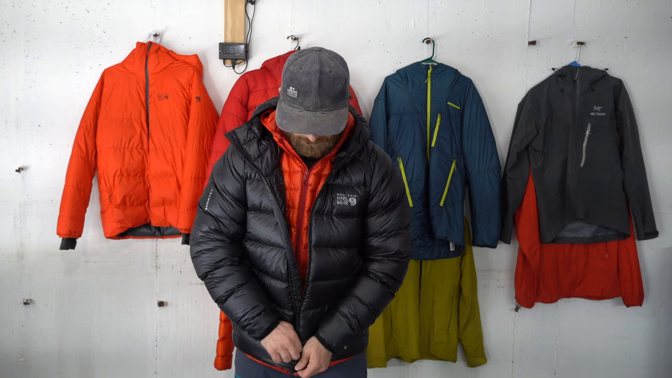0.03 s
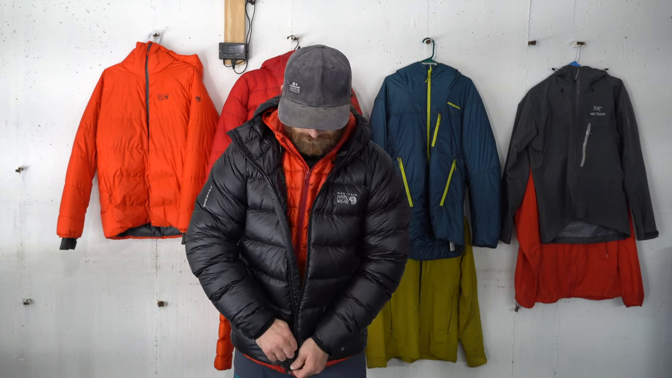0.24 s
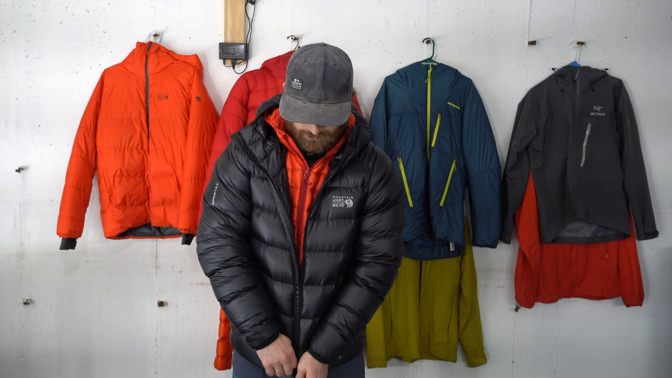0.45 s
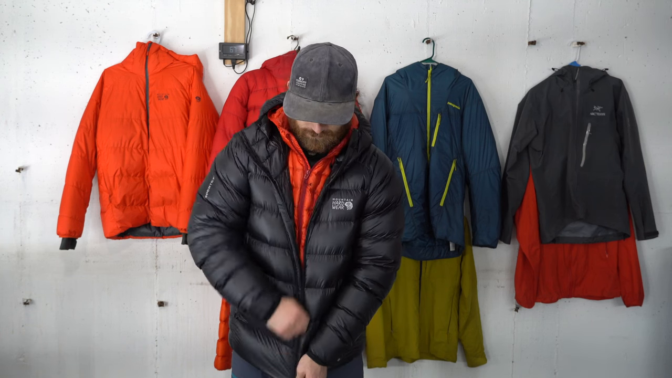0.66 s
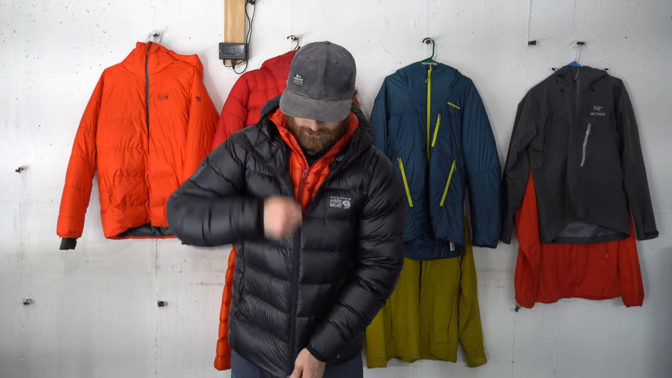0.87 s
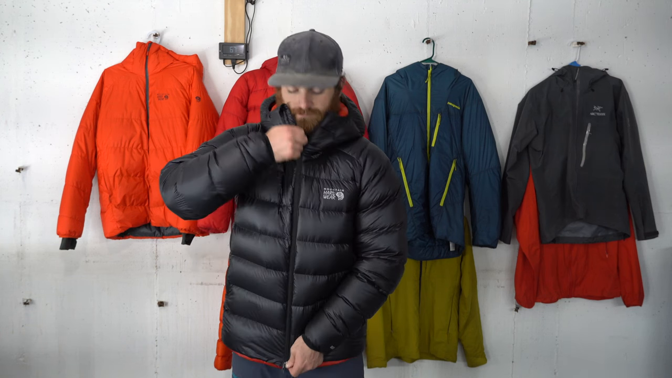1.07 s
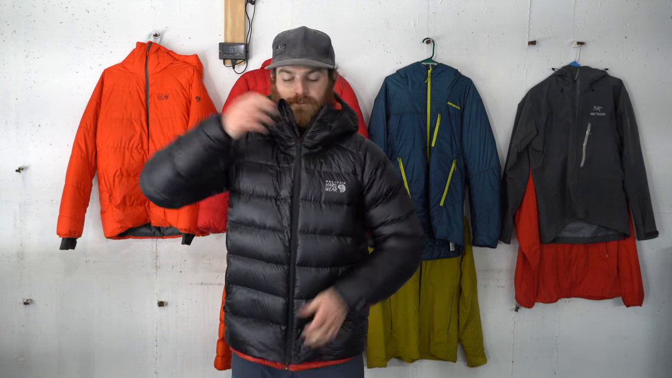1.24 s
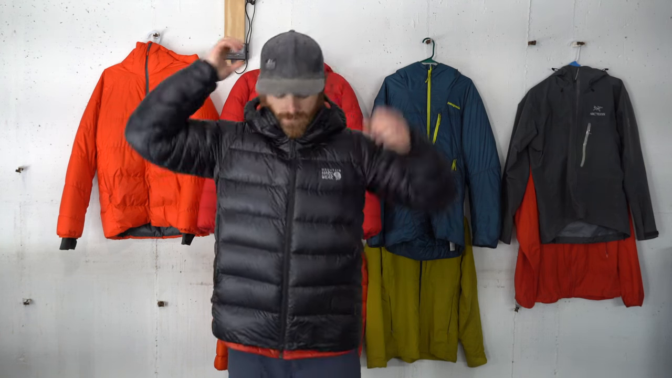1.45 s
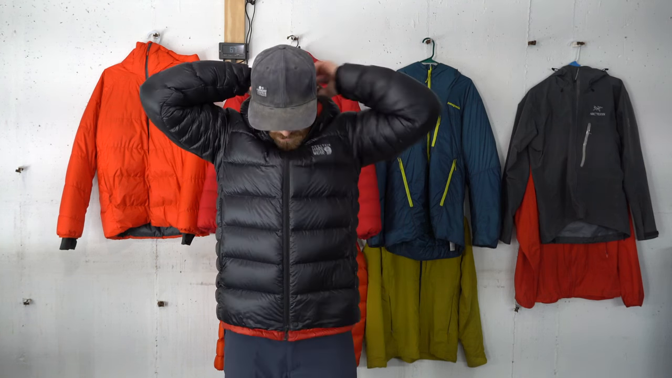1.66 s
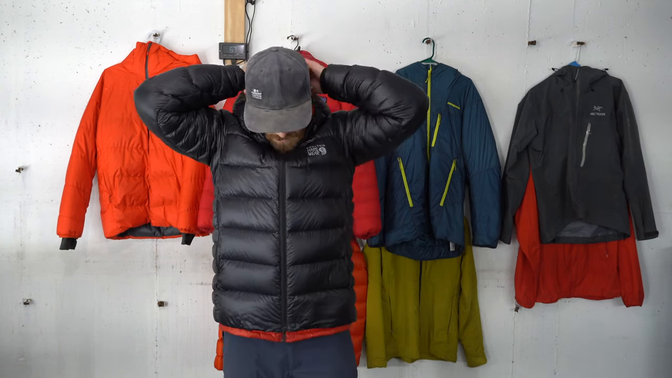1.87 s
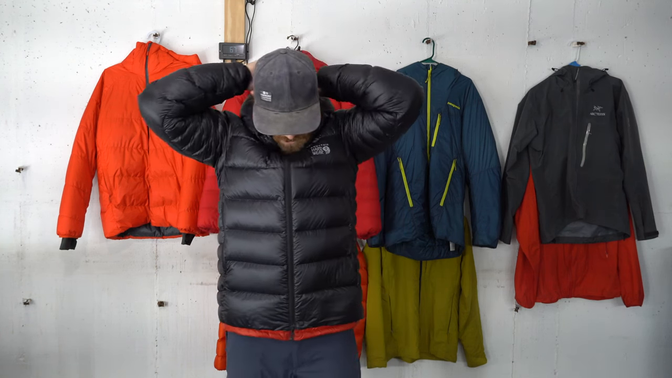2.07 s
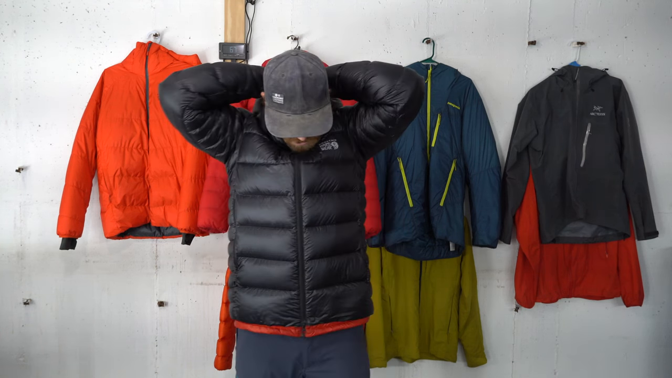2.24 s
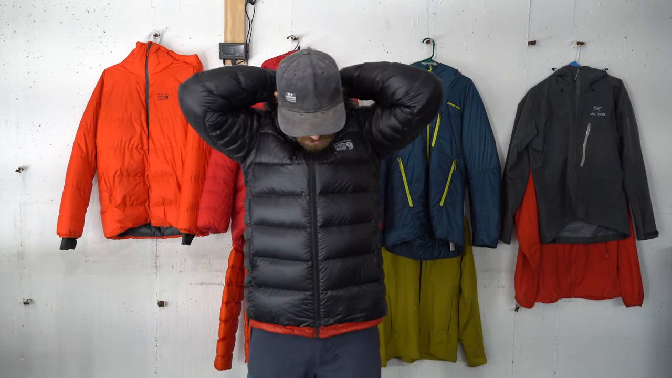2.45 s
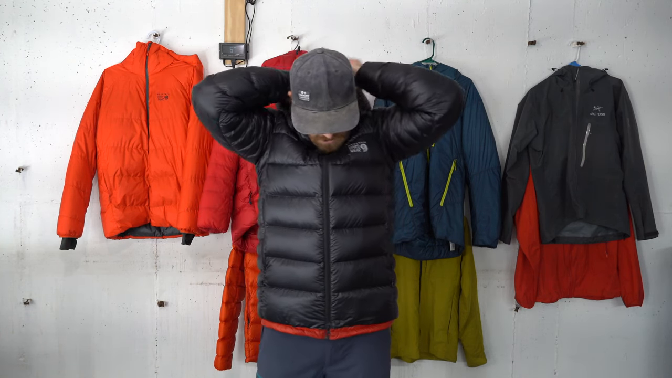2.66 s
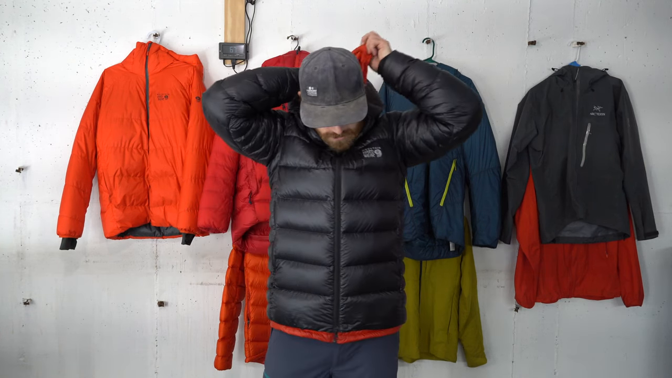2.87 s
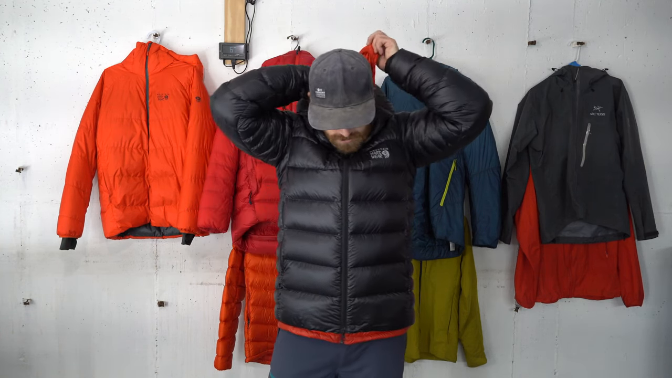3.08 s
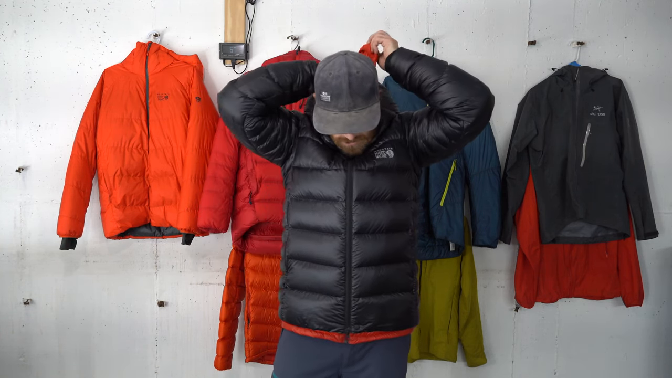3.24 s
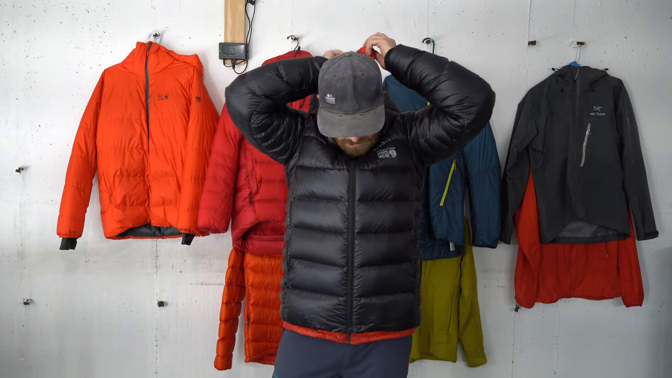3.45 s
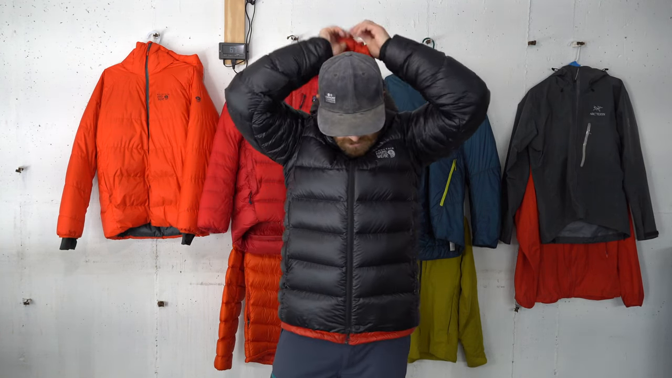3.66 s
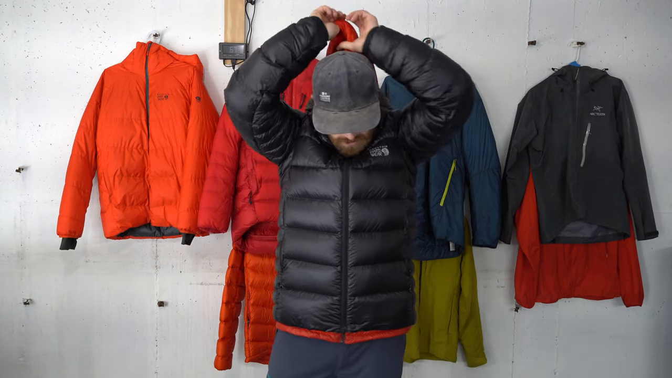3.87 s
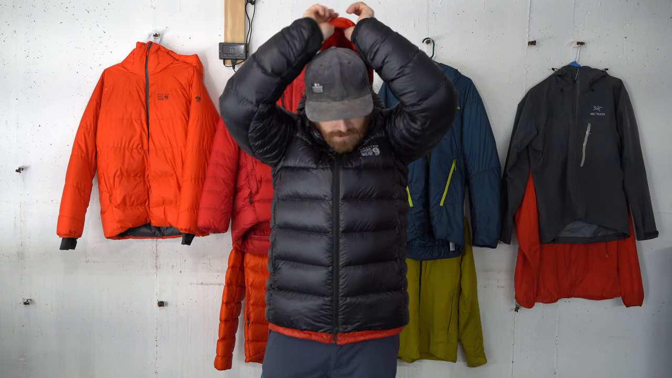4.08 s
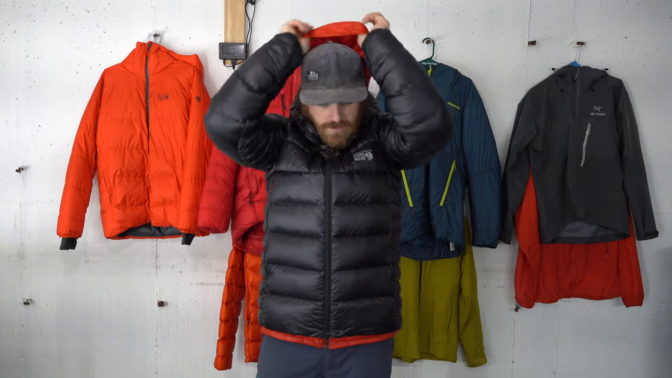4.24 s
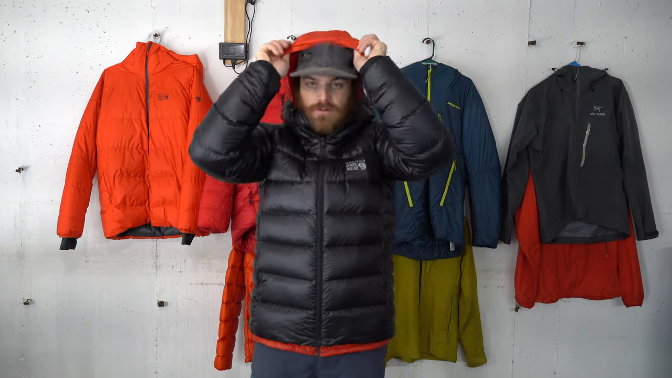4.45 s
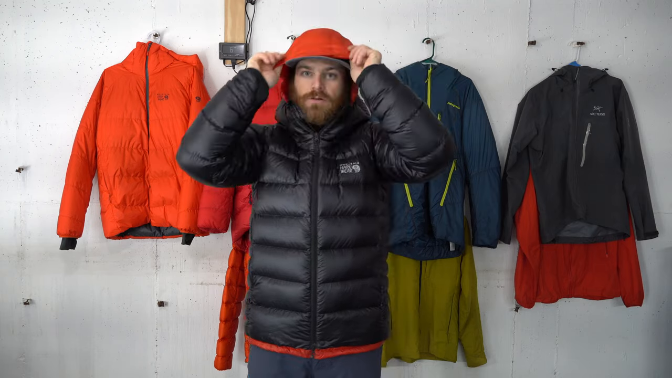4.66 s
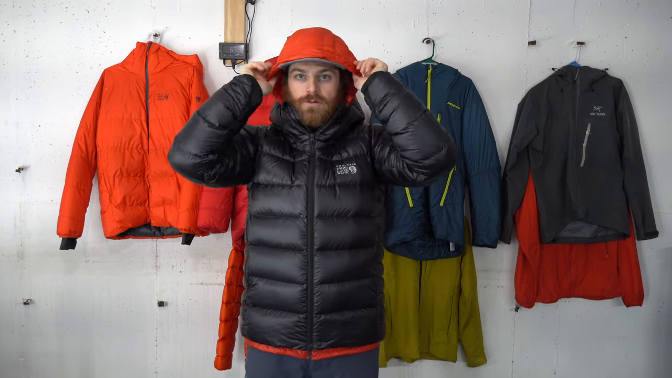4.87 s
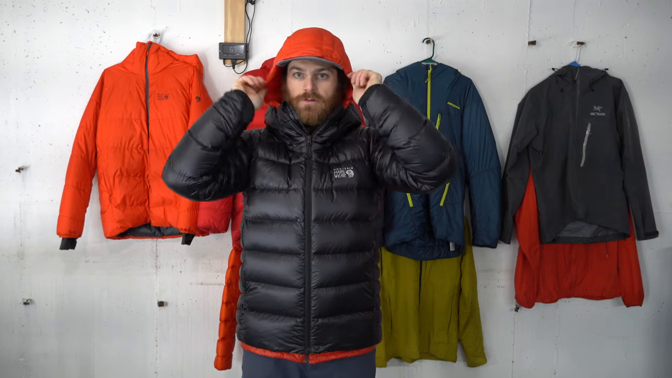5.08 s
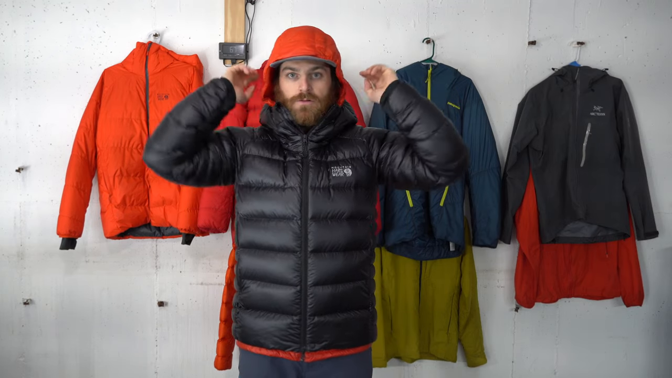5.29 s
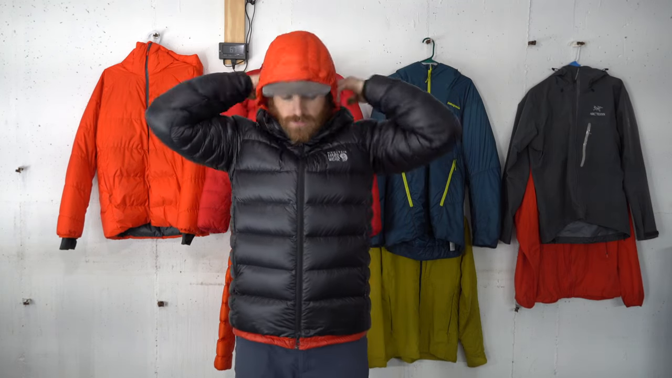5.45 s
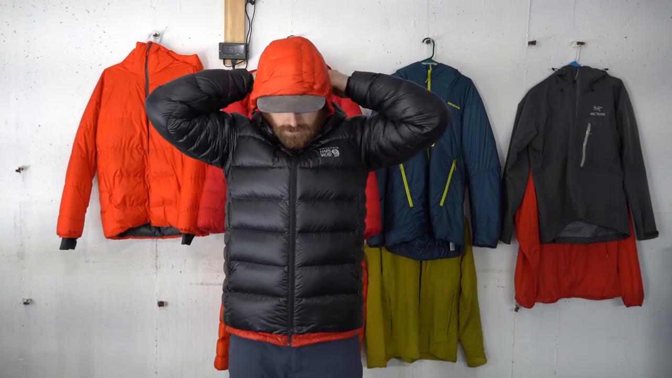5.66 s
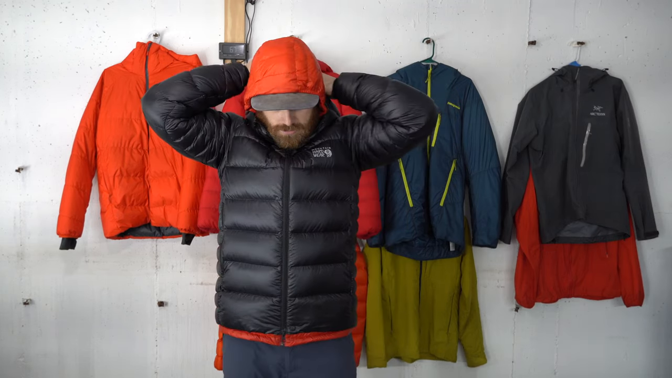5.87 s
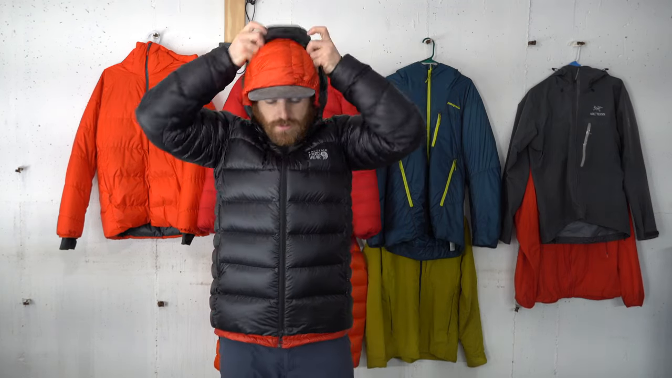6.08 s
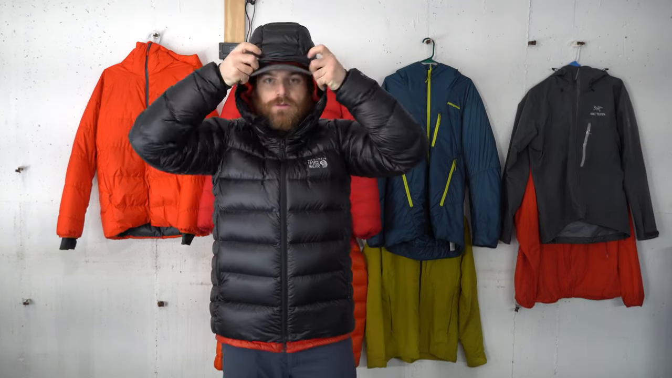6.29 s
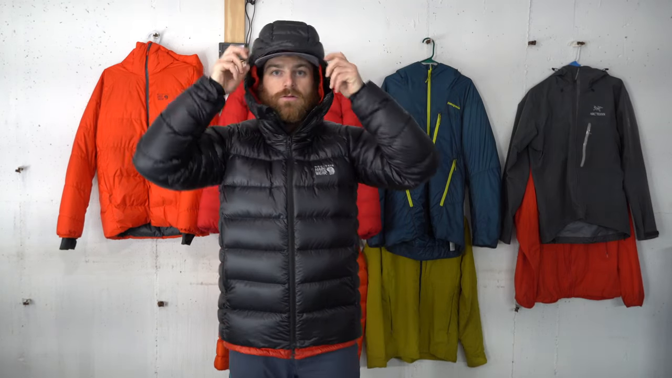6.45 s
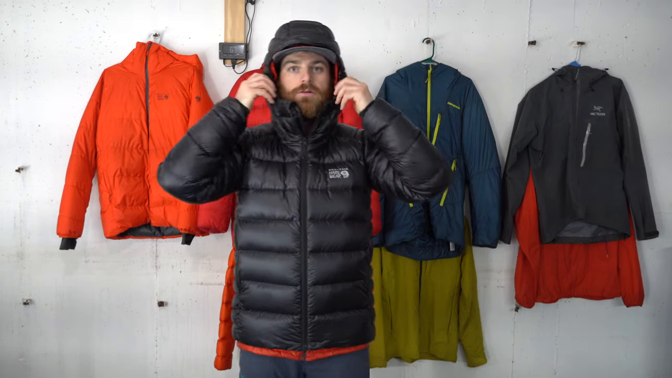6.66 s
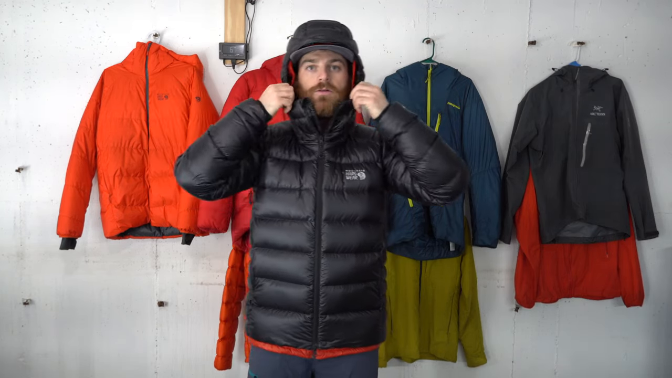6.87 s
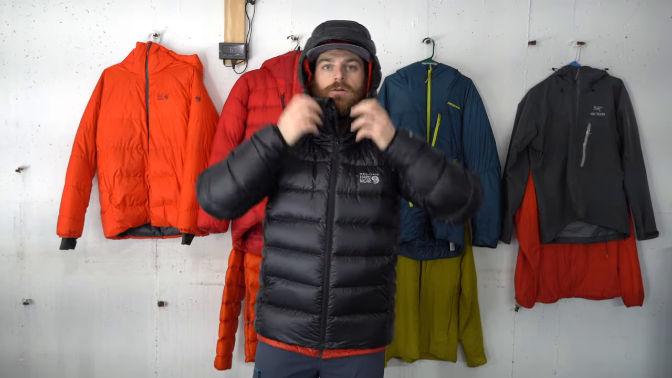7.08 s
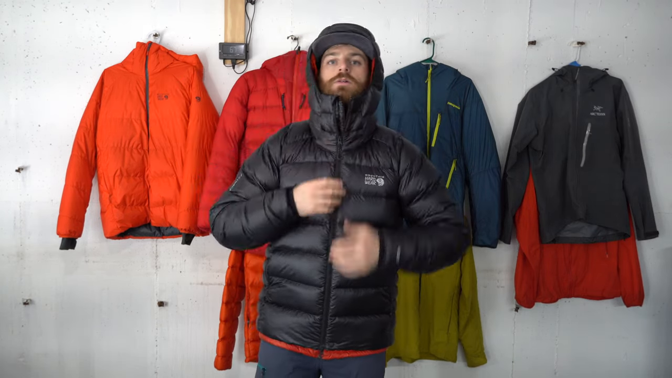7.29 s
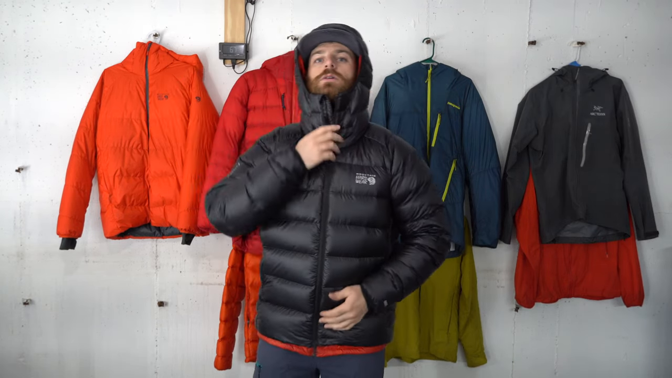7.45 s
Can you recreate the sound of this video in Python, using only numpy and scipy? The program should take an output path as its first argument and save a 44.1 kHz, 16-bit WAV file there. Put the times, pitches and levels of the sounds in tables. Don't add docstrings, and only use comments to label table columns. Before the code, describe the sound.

Close, dry indoor sound of a puffy jacket zipped up fast with a buzzing whir, followed by swishing, crinkling, softly bumping nylon.

```python
import sys
import numpy as np
from scipy import signal
from scipy.fft import rfft, irfft, next_fast_len
from scipy.io import wavfile
from scipy.ndimage import uniform_filter1d

SR = 44100
rng = np.random.default_rng(int(sys.argv[2]) if len(sys.argv) > 2 else 0)


def amplitude_ratio(level_db):
    exponent = np.asarray(level_db, float) / 20
    return 10 ** exponent


def generate_wav(sig):
    pcm = np.round(np.clip(np.atleast_2d(sig).T, -1, 1) * 32767).astype(np.int16)
    wavfile.write(sys.argv[1], SR, pcm)


N = 331835
TIME = np.arange(N) / SR

# [t/s, tooth rate f/Hz, level/dB, lean to one row of teeth/dB, third partial/dB]
ZIP_START = [
    (.71, 790, -42, 3, -66),
    (.724, 760, -33, -4, -62),
    (.749, 684, -26, -13, -62),
    (.772, 716, -27, -23, -64),
    (.8, 640, -23.5, -24, -57),
    (.825, 632, -23, -14, -53),
]
# [t/s, tooth rate f/Hz, level/dB, lean/dB, third partial/dB]
ZIP_PULL = [
    (.842, 637.3, -23, 0, -59),
    (.858, 722, -28.5, 6, -60),
    (.876, 796, -29.5, 10, -62),
    (.9, 878, -31.5, 8, -54),
    (.934, 918.4, -32, 0, -49),
    (.965, 970, -33, 10, -61),
]
# [t/s, tooth rate f/Hz, level/dB, lean/dB, third partial/dB]
ZIP_DRAG = [
    (.984, 985, -35, 5, -52),
    (1.008, 765, -21, -7, -39),
    (1.037, 714, -21, -12, -47),
    (1.068, 552.8, -30, 1, -48),
    (1.088, 480, -32.5, 2, -33),
    (1.114, 415, -31, -3.5, -31),
    (1.13, 340, -34, 9, -39),
    (1.14, 281, -28, 5, -35),
    (1.151, 205, -33, 6, -42),
]
# [t/s, tooth rate f/Hz, level/dB, lean/dB, third partial/dB]
ZIP_TUG = [
    (1.168, 455.5, -26, 3, -40),
    (1.186, 372.4, -27.5, 7.5, -32),
    (1.198, 300, -34, 12, -39),
    (1.211, 233, -26, 4, -31),
    (1.218, 185, -23, 0, -38),
    (1.2235, 150, -22, -3, -43),
]
# [t/s, share of speed lost]
SNAGS = [
    (1.014, 0.043),
    (1.028, 0.1124),
    (1.048, 0.136),
    (1.06, 0.02),
    (1.075, 0.078),
    (1.093, 0.051),
    (1.101, 0.091),
]
# [fourth partial/dB, wobble 0-1]
FREE = (-67, 0.009)
GRITTY = (-49.5, 0.022)
# [f/Hz, width/Hz, boost/dB]
TAPE_RINGS = [
    (900, 300, 4),
    (2680, 320, 12),
    (3400, 250, 7),
]
# [f/Hz, level/dB per Hz]
RASP = [(150, -30), (400, -2), (1200, -2), (2700, -6), (3800, -14), (6000, -40)]

# [f/Hz, level/dB per Hz]
PUSH = [(12, -26), (20, -3.5), (48, 1), (161, -4.5), (253, -9), (300, -12.5), (390, -24), (660, -120)]
RUB = [(59, -16), (100, -5), (162, -3.5), (271, -3), (434, -3.5), (1310, -10), (2500, -26), (3250, -40),
       (5500, -120)]
SCRAPE = [(700, -55), (1300, -3.5), (1900, 0), (3000, -5), (4500, -13), (7500, -26), (9000, -62)]
SWISH = [(1470, -23), (2500, -4), (3720, -5), (4830, -5.5), (7240, -8.5), (8830, -21), (12600, -20.5),
         (14100, -24), (14900, -29), (15600, -37)]
# [peak t/s, rise/s, fall/s, rub level/dB, scrape share/dB]
MOVES = [(.2, .9, 0.19, -70, -18), (.523, 0.11, 0.2, -47, -15.5), (.8, 0.21, 0.43, -51, -14),
         (1.042, 0.07, 0.29, -44, -12), (1.201, 0.37, 0.089, -41, -14.5),
         (1.268, 0.048, 0.026, -38.5, -4.5), (1.47, 0.36, 0.99, -40.5, -5),
         (1.6, 0.092, 0.22, -35.5, -6), (1.95, 0.19, 0.22, -49.5, -25), (2.24, 0.16, .12, -44, -9.5),
         (2.32, 0.13, 0.21, -40.5, -10.5), (2.42, 0.21, 0.19, -41.5, -12.5),
         (2.38, 0.34, 0.61, -45, -26), (2.918, 0.28, 0.21, -37.5, -6), (3.2, 0.2, 0.15, -45, -7.5),
         (3.28, 0.21, 0.031, -42.5, -8), (3.426, 0.2, 0.088, -45, -11), (3.593, 0.17, 0.17, -44, -11.5),
         (3.766, 0.18, 0.13, -40, -16), (3.812, 0.097, 0.033, -40.5, -12), (3.9, .15, 0.12, -45.5, -12),
         (4.079, 0.15, 0.21, -36.5, -11), (4.348, 0.47, 0.33, -41.5, -8.5), (4.57, 0.77, 0.45, -50, -13),
           (4.753, 0.064, 0.54, -51, -35), (5.075, 0.069, 0.14, -45, -15), (5.19, 0.16, 0.083, -47.5, -8.5),
           (5.325, 0.097, .12, -46, -11), (5.43, 0.15, 0.12, -47.5, 0.5), (5.54, 0.16, 0.2, -38.5, -6),
           (5.62, 0.063, 0.15, -46, -9), (5.78, 0.89, 0.87, -48, -10.5), (6.07, 0.13, 0.092, -40.5, -12.5),
           (6.16, 0.18, 0.2, -34, -8), (6.25, .1, 0.15, -38.5, -8), (6.49, 0.18, 0.127, -48, -12),
           (6.66, 0.17, 0.16, -47, -17), (6.95, 0.064, 0.11, -48.5, 0), (7.06, 0.22, 0.11, -42.5, -6.5),
           (7.311, 0.35, 0.37, -48.5, -26),
         (2.87, 0.086, 0.12, -59, 6),
    (6.11, 0.056, 0.098, -34.5, -7),
    (1.739, 0.043, 0.18, -39.5, -20.5),
    (3.21, 0.093, 0.094, -53, 2.5),
    (4.338, 0.039, 0.047, -39.5, -4),
    (5.789, 0.032, 0.062, -56, -18),
    (6.22, 0.16, 0.093, -42, -3),
]
# [peak t/s, rise/s, fall/s, swish level/dB]
BRUSHES = [(.3, 0.96, 0.061, -76), (.48, 0.089, .08, -66.5), (0.535, 0.087, 0.072, -61.5),
           (.58, 0.065, .045, -66), (.71, 0.056, 0.54, -65.5), (.95, 0.39, .3, -67.5),
           (1.049, 0.14, 0.22, -56), (1.203, 0.13, 0.11, -54), (1.27, .06, .03, -58),
           (1.508, 0.3, 0.21, -52), (1.695, 0.04, 0.26, -64.5), (2.33, .25, 0.17, -66),
           (2.43, 0.17, 0.13, -66.5), (2.669, 0.049, 0.16, -76), (2.925, 0.13, 0.17, -62),
           (3.28, 0.18, 0.03, -78), (3.58, 0.056, 0.063, -84), (3.899, 0.31, 0.12, -72),
           (4.092, 0.19, 0.26, -62), (4.33, 0.2, 0.22, -58), (4.43, 0.055, 0.73, -57.5),
           (4.738, 0.048, 0.74, -62), (5.07, 0.09, 0.13, -58), (5.183, 0.15, 0.051, -57),
           (5.28, 0.059, 0.66, -60.5), (5.635, 1, 0.084, -62.5), (5.833, 0.13, 0.04, -67.5),
           (6.09, 0.15, .15, -63.5), (6.205, 0.15, 0.3, -54.5), (6.467, 0.087, 0.12, -61),
           (6.635, 0.28, 0.23, -59.5), (7.061, 0.29, 0.13, -55.5), (7.23, 0.13, 0.18, -67),
           (7.39, 0.22, 0.17, -60.5)]
# [peak t/s, rise/s, fall/s, push level/dB]
PRESSES = [
    (.715, 0.063, 0.065, -45),
    (1.22, 0.13, 0.029, -33),
    (2.17, 0.19, 0.34, -45.5),
    (2.491, 0.14, .1, -43),
    (3.5, .15, 0.16, -59),
    (4.5, 0.21, 0.55, -51),
    (6.68, 0.26, 0.16, -47),
    (6.87, 0.14, 0.096, -45.5),
    (7.07, 0.093, 0.11, -42),
]
# [t/s, creases per second]
CRINKLE = [(0, 43), (.34, 40), (.4, 8.4), (1.75, 8.3), (1.85, 70), (2.7, 74), (3.3, 99), (4.0, 110),
           (4.4, 12), (5.55, 12), (5.8, 44), (6.05, 8), (7.1, 10), (7.52, 49)]

# [t/s, level/dB peak, f/Hz, cycles, first swing in -1
KNOCKS = [
    (1.2236, -12.5, 125, 0.57, -1),
    (1.4206, -20.5, 370, 1.2, 1),
    (1.4242, -22, 560, 1.3, 1),
    (1.4862, -20, 1200, 2.7, 1),
    (1.6852, -20, 1050, 1.6, 1),
    (6.1248, -19, 325, 0.83, 1),
    (6.1405, -28, 600, 0.73, -1),
    (7.058, -27.5, 201, 0.64, -1),
]
# [t/s, level/dB peak, f/Hz, cycles, first swing in -1 or out 1]
SEATING = [
    (.6775, -37, 320, 1.1, 1),
    (0.706, -24.5, 523, 0.73, -1),
    (0.707, -23, 80, 2.3, 1),
]
# [t/s, level/dB peak, f/Hz, cycles]
POPS = [(1.975, -29.5, 440, 0.32), (2.034, -32, 850, 1.2), (2.226, -36.5, 581, 0.73),
        (2.265, -35, 272, 1.1), (2.558, -33, 650, 1.1), (2.778, -32, 334, 0.77), (3.408, -39, 388, 0.62),
        (3.515, -56, 374, 1.2), (3.556, -40, 361, 1.1), (3.577, -36.5, 260, 1.5), (3.762, -31, 295, 1),
        (3.877, -32, 624, 1.5), (4.262, -30, 875, 1.9), (5.666, -24, 850, 0.78), (5.682, -29, 800, .7),
        (5.781, -38, 460, 1.6), (5.807, -30.5, 463, 1.3), (5.907, -36, 800, 0.8), (5.947, -38, 514, 1.1),
        (6.001, -43, 891, 1.9), (6.48, -31, 650, 1.1), (6.606, -41, 304, 1.5), (6.663, -29.5, 466, 0.63),
        (6.918, -35.5, 225, 0.67), (7.227, -47, 412, 1.3), (7.417, -37.5, 476, 1.3)]
# [t/s, level/dB peak, share of air/dB]
TICKS = [(1.4171, -26, -28), (1.5019, -33, -35), (1.751, -35, -15), (2.149, -48, -10), (2.318, -43, -18),
         (2.355, -41, -7), (2.409, -28.5, -19), (2.54, -33, -32), (2.558, -32, -29), (2.667, -35, -24),
         (2.764, -38, -27), (2.841, -34, -28), (2.9032, -28, -33), (3.0454, -36, -24), (3.176, -30, -32),
         (3.49, -32, -38), (3.7517, -37, -27), (3.818, -34.5, -25), (3.901, -33, -28), (4.023, -27, -29.5),
         (4.2473, -30.5, -23), (4.289, -40, -26), (4.313, -37, -24), (4.337, -23, -31),
         (4.7337, -32.5, -24), (5.0992, -39, -25), (5.929, -36, -33), (6.4571, -45, -23), (7.159, -33, -20),
         (7.4463, -34, -26)]
# [t/s, level/dB peak, share of air/dB]
FAINT_TICKS = [(0.0503, -49.5, -9), (0.0584, -52, -13), (0.0914, -56, -21), (0.1261, -48, -23),
               (0.1404, -44, -19), (0.1655, -55, -23), (0.1854, -59, -19), (0.2064, -60, -27),
               (0.2184, -61, -15), (0.2334, -49, -20), (0.2513, -51, -23), (0.278, -55, -24),
               (0.3411, -46, -32), (0.3735, -59, -22), (0.407, -61, -19), (0.4434, -50, -21),
               (0.5375, -45, -30), (0.5574, -45, -29), (0.5924, -52, -20), (1.9699, -44, -25),
               (2.0524, -45, -27), (2.0906, -44, -27), (2.2254, -47.5, -24), (2.6539, -42, -25),
               (2.705, -54, -26), (2.7257, -49, -22), (2.801, -49, -30), (2.8564, -36, -22),
               (2.8754, -45, -26), (3.021, -39, -27), (3.0686, -39, -30), (3.1004, -47, -26),
               (3.1173, -41, -30), (3.1344, -57, -24), (3.2286, -55, -26), (3.267, -42, -32),
               (3.2764, -49, -26), (3.3528, -47, -28), (3.5153, -36, -31), (3.5604, -50, -28),
               (3.6128, -38, -24), (3.6316, -51, -24), (3.6561, -52, -26), (3.691, -54, -29),
               (3.71, -52, -26), (3.7239, -43, -27), (3.8726, -42, -21), (5.7254, -51, -25),
               (5.7404, -49, -26), (5.946, -35, -29), (6.835, -37, -23),
               (2.17, -44, -26), (2.206, -46, -26), (2.327, -42, -26), (2.418, -46, -26), (2.464, -48, -24),
              (3.95, -42, -26), (3.983, -41, -30), (4.16, -31, -26), (4.208, -40, -30), (4.5724, -38, -23),
              (4.935, -38.5, -30), (5.642, -46, -24), (5.651, -36, -24), (5.864, -46, -24),
              (5.9807, -41, -21), (6.075, -38, -22), (6.193, -41, -18), (6.354, -43, -16),
              (6.887, -50, -24), (7.112, -49, -30), (7.192, -47, -20), (7.213, -56, -20), (7.25, -53, -20),
              (7.277, -46, -15), (7.4793, -48, -23), (7.491, -46, -20), (7.518, -40, -15)]
# [t/s, level/dB peak, f/Hz, cycles]
BUMPS = [(1.264, -30, 141.9, 1.7), (1.581, -27.5, 38.5, 0.57), (1.828, -38.5, 49, 1.1),
         (2.249, -44, 32.3, 1.2), (2.473, -32, 51.4, 1.1), (2.638, -39, 40.4, 0.71),
         (2.513, -31, 110, 0.56), (2.913, -27.5, 70, 0.83), (2.977, -28, 54, 0.79), (3.415, -40, 132, 1.5),
         (3.743, -29.5, 81, 3.9), (3.789, -42, 32.3, 1.3), (4.361, -33, 119, 0.95), (4.39, -33.5, 113, 1.3),
         (4.488, -32, 38.5, 0.6), (4.619, -36.5, 32.5, 0.48), (5.352, -49, 36, 1.4), (5.784, -31, 171, 1.6),
         (6.198, -27.5, 116, 1.3), (6.749, -50, 32.3, 1.46), (6.929, -34.5, 56.7, 0.6),
         (7.057, -35, 54.5, 0.62), (7.112, -40, 60, .7)]

# [f/Hz, level/dB per Hz]
TAPE_HISS = [(200, -34), (450, -3), (600, 1.5), (900, 1), (1800, -7.5), (3500, -46)]
# [f/Hz, level/dB per Hz]
ROOM = [(12, -43), (20, -8), (274, -6), (352, -10.5), (440, -2), (535, -3.5), (1270, -13), (6930, -54),
        (8430, -40.5), (15600, -37)]


def zipper():
    s, *columns = np.vstack([ZIP_START, ZIP_PULL, ZIP_DRAG, ZIP_TUG]).T
    hz, level_db, lean_db, third_db = (np.interp(TIME, s, column) for column in columns)
    grit = np.clip((TIME - 0.985) / 0.02, 0, 1)
    fourth_db, wobble = (free + (gritty - free) * grit for free, gritty in zip(FREE, GRITTY))
    for at, lost in SNAGS:
        hz = hz * (1 - lost * np.exp(-((TIME - at) / 0.00399) ** 2))
    uneven_hz = hz * (1 + wobble * walk(300) + 0.5 * wobble * walk(600))
    phase = 2 * np.pi * np.cumsum(uneven_hz) / SR

    def ring_db(k):
        return sum(db * np.exp(-((k * hz - f) / width) ** 2) for f, width, db in TAPE_RINGS)

    asleep_db = -12 * np.clip((0.79 - TIME) / 0.02, 0, 1)
    partial_db = [level_db + lean_db, level_db, third_db, fourth_db + ring_db(4) + asleep_db]
    speed_db = (60 - 64 * grit) * np.log2(hz / 960)
    for k in range(5):
        ringing_db = grit * (1 + ring_db(k + 5) / (0.6 * k + 1.3))
        partial_db.append(-60 - 3.5 * k + ringing_db + speed_db)

    tone = np.zeros(N)
    for k, db in enumerate(partial_db):
        shake_db = walk(200) + 1.2 * grit * walk(450)
        shake_db = shake_db + (k > 2) * 1.5 * walk(60) + (k > 1) * 3 * walk(500)
        tone += amplitude_ratio(db + shake_db) * np.sin((k + 1) * phase - 2.9 * k)

    beat_s, beat_lasts_s, teeth_per_beat = 0.8, 0.03, 7.5
    beat_level = amplitude_ratio(-38 + 1.5 * walk(90)) * np.exp(-((TIME - beat_s) / beat_lasts_s) ** 2)
    tone += beat_level * np.cos(phase / teeth_per_beat) * np.sin(phase)

    rasp_db, rasp_sharpness = -43, 2.5
    grating = np.exp(rasp_sharpness * (np.cos(phase) - 1)) * amplitude_ratio(2.5 * walk(80.6))
    tone += amplitude_ratio(rasp_db) * grit * colour(grating * rng.standard_normal(N), RASP)
    running = np.clip((TIME - s[0]) / 0.0029, 0, 1) * np.clip((s[-1] - TIME) / 0.0015, 0, 1)
    return np.sqrt(2) * tone * running


def shell():
    *moves, share_db = np.array(MOVES).T
    rubs = swells(*moves)
    brushes = swells(*np.transpose(BRUSHES))
    rub_db = summed(rubs, rest_db=-67)
    swish_db = summed(brushes, rest_db=-79)
    scrape_db = summed(np.vstack([rubs + share_db[:, None], brushes + 6]), rest_db=-76)
    push_db = -47.5 + 1.04 * (rub_db + 42)
    push_db = summed(np.vstack([swells(*np.transpose(PRESSES)), push_db]), rest_db=-83)

    grip = walk(110)
    push = cloth(PUSH, (25, 150), walk(17), share=0.23, rate=67, spread_db=3.5, flicker_db=2, flicker_rate=8.1)
    rub = cloth(RUB, (200, 1200), grip, share=0.25, rate=800, spread_db=1, flicker_db=1.3, flicker_rate=28)
    scrape = cloth(SCRAPE, (1800, 4000), grip, share=0.41, rate=1200, spread_db=3,
                   flicker_db=0.5, flicker_rate=35)
    swish = cloth(SWISH, (6000, 14000), grip, share=0.24, rate=1100, spread_db=5,
                  flicker_db=1.5, flicker_rate=35)

    through_jacket = amplitude_ratio(push_db - 2.5) * push + amplitude_ratio(rub_db - 0.5) * rub + amplitude_ratio(scrape_db - 3.5) * scrape
    return through_jacket + amplitude_ratio(swish_db + 0.5) * swish + crinkle(scrape_db)


def crinkle(scrape_db):
    out = np.zeros(N)
    s, rate = np.transpose(CRINKLE)
    clumps = np.exp(0.86 * walk(15))
    for at, keep, pitch, size in rng.random((1400, 4)) * [N / SR - 0.01, 186, 1, 1]:
        hz = 1800 * 6 ** (pitch ** 1.2)
        i = int(at * SR)
        if keep < np.interp(at, s, rate) * clumps[i]:
            db = scrape_db[i] + 8.5 + 5 * size - 0.69 * np.log2(hz / 3000)
            add(out, at, db, hz, cycles=2.6)
    dull = lowpass(out, 6, 7600)
    return dull + amplitude_ratio(-14) * (out - dull)


def creases():
    out, ticks, dulled = np.zeros((3, N))
    for s, db, hz, cycles in POPS:
        add(dulled, s, db + 0.5, hz, cycles)
    faint = [(s, db + 2, air_db - 3) for s, db, air_db in FAINT_TICKS]
    for s, db, air_db in TICKS + faint:
        pitch, other, late = rng.random(3)
        add(ticks, s, db - 4, 2400 * 2.2 ** pitch, 2)
        add(ticks, s + 0.001 + 0.00232 * late, db - 9, 1800 * 3.6 ** other, 2.4)
        add(out, s, db + air_db + 9, 11000, 1.6)
    for s, db, hz, cycles in BUMPS:
        add(out, s, db, hz, cycles)
    for s, db, hz, cycles, way in KNOCKS:
        add(out, s, db, hz, cycles, way)
    for s, db, hz, cycles, way in SEATING:
        add(dulled, s, db, hz, cycles, way)
    return out + lowpass(dulled, 2, 1700) + lowpass(ticks, 4, 8000)


def tape():
    start_s, end_s = ZIP_START[0][0], ZIP_DRAG[1][0]
    running = np.clip((TIME - start_s) / 0.053, 0, 1) * np.clip((end_s - TIME) / 0.034, 0, 1)
    uneven_db = 1.8 * walk(40)
    return amplitude_ratio(-41.5 + uneven_db) * running * colour(rng.standard_normal(N), TAPE_HISS)


def room():
    return amplitude_ratio(-57) * colour(rng.standard_normal(N), ROOM)


def cloth(points, band, together, share, rate, spread_db, flicker_db, flicker_rate):
    slipping = rng.random(N) < rate * np.exp(0.6 * walk(50)) / SR
    slip_db = spread_db * np.minimum(rng.exponential(size=N), 3)
    slips = slipping * rng.standard_normal(N) * amplitude_ratio(slip_db)
    slips /= np.sqrt(np.mean(slips ** 2))
    hiss = rng.standard_normal(N)
    raw = colour(np.sqrt(1 - share) * hiss + np.sqrt(share) * slips, points)

    size = next_fast_len(N)
    octave = np.log2(np.fft.rfftfreq(size, 1 / SR) + 1)
    spectrum = rfft(raw, size)
    lowest, highest = np.floor(np.log2(points[0][0])), np.log2(points[-1][0])
    out = np.zeros(N)
    for centre in np.arange(lowest, highest + 1):
        part = irfft(spectrum * np.clip(1 - abs(octave - centre), 0, 1), size)[:N]
        out += part * amplitude_ratio(flicker_db * (0.69 * together + 0.54 * walk(flicker_rate)))
    inside = signal.sosfilt(signal.butter(4, band, "bandpass", fs=SR, output="sos"), out)
    return out / np.sqrt(np.mean(inside ** 2))


def add(out, s, db, hz, cycles, way=1):
    cycles = max(cycles, 0.4)
    turn = np.arange(int(3 * cycles * SR / hz)) * hz / SR
    swing = -np.sin(2 * np.pi * turn ** 0.72)
    blow = swing * np.exp(-1.6 * (turn / cycles) ** 2) * np.clip(turn / 0.28, 0.55, 1)
    i = int(s * SR)
    out[i:i + len(blow)] += way * amplitude_ratio(db) * blow[:N - i] / abs(blow).max()


def swells(peak_s, rise_s, fall_s, db):
    late = TIME - peak_s[:, None]
    distance = np.where(late < 0, -late / rise_s[:, None], late / fall_s[:, None])
    return db[:, None] - 20 * distance ** 1.505


def summed(levels_db, rest_db):
    return 10 * np.log10(np.sum(10 ** (levels_db / 10), axis=0) + 10 ** (rest_db / 10))


def walk(rate):
    k = int(SR / rate)
    held = np.repeat(rng.standard_normal(N // k + 1), k)
    return 1.3 * uniform_filter1d(uniform_filter1d(held, k), k)[:N]


def colour(x, points):
    hz, db = np.transpose(points)
    size = next_fast_len(N)
    gain = amplitude_ratio(np.interp(np.log(np.fft.rfftfreq(size, 1 / SR) + 1), np.log(hz), db))
    y = irfft(rfft(x, size) * gain, size)[:N]
    return y / np.sqrt(np.mean(y ** 2))


def lowpass(x, order, hz):
    return signal.sosfilt(signal.butter(order, hz, fs=SR, output="sos"), x)


def scene():
    return np.tile(zipper() + shell() + creases() + tape() + room(), (2, 1))


def band_limit(x):
    return signal.sosfilt(signal.butter(12, 15700, fs=SR, output="sos"), x)


def record(dry):
    bass = lowpass(lowpass(dry[0], 1, 5200), 1, 5200)
    tilt = (1 - amplitude_ratio(-1.7)) / 2 * bass
    top = signal.sosfilt(signal.butter(3, 10200, "highpass", fs=SR, output="sos"), dry[0])
    stray = amplitude_ratio(-14.5) * top * walk(3000)
    return band_limit(dry + np.array([stray - tilt, tilt - stray]))


dry = scene()
out = record(dry)
generate_wav(out)
```